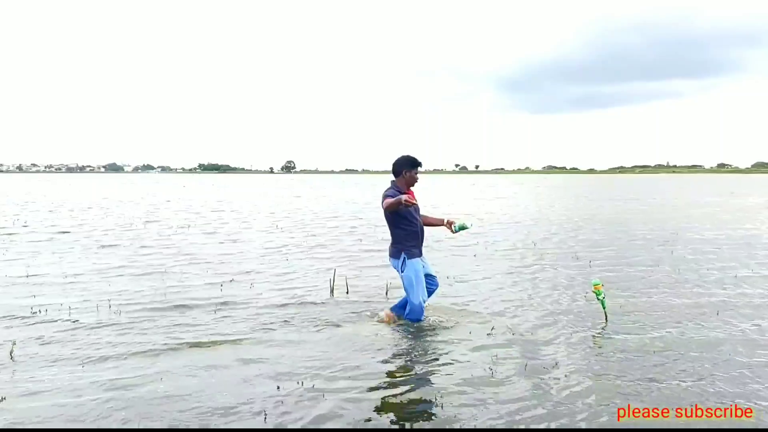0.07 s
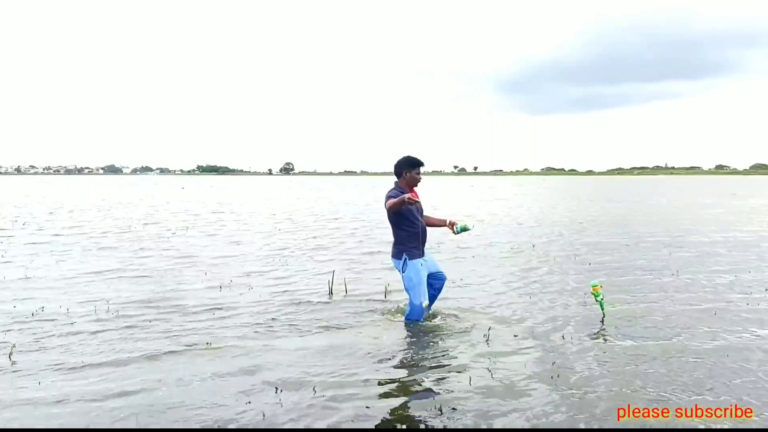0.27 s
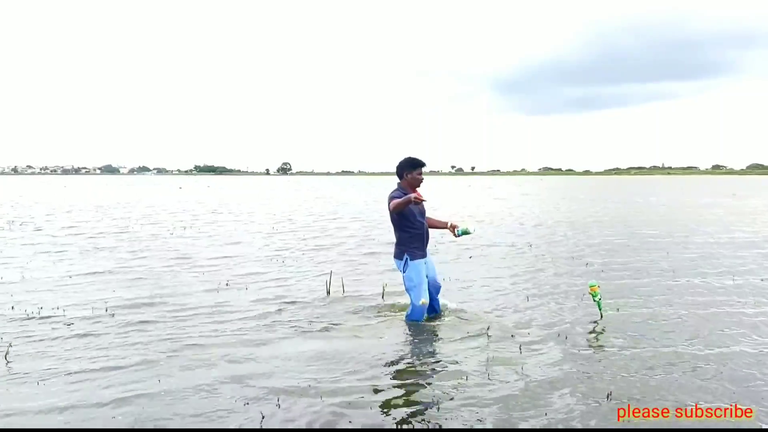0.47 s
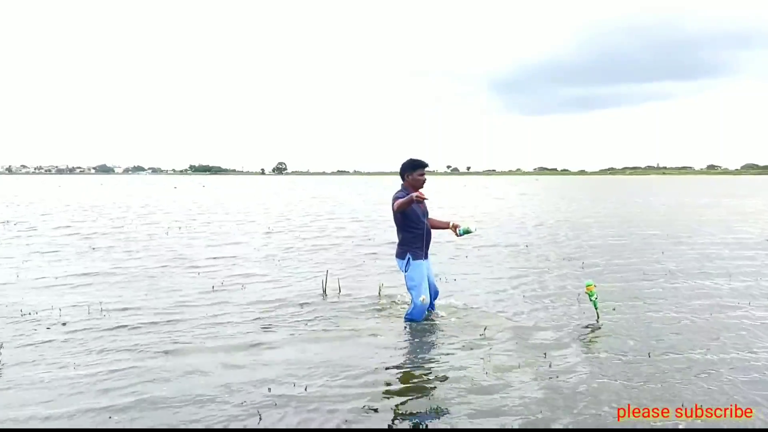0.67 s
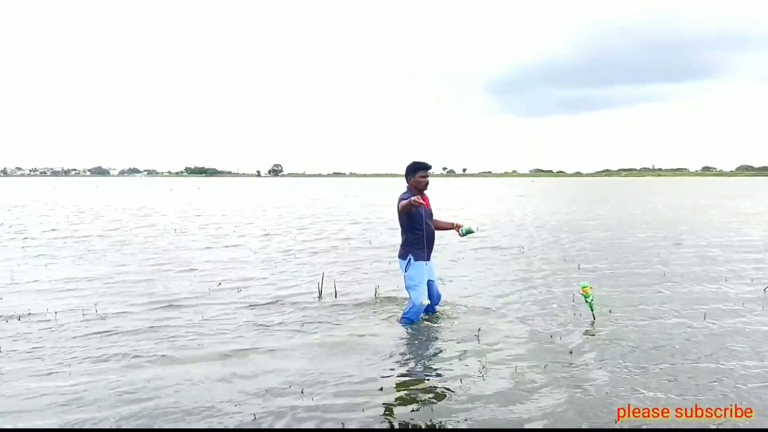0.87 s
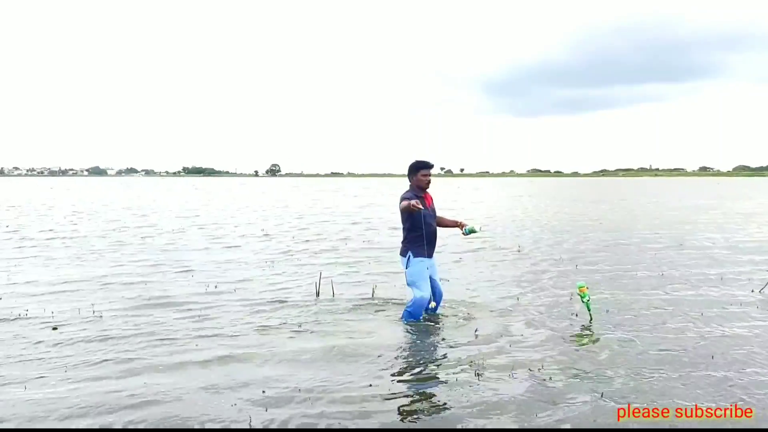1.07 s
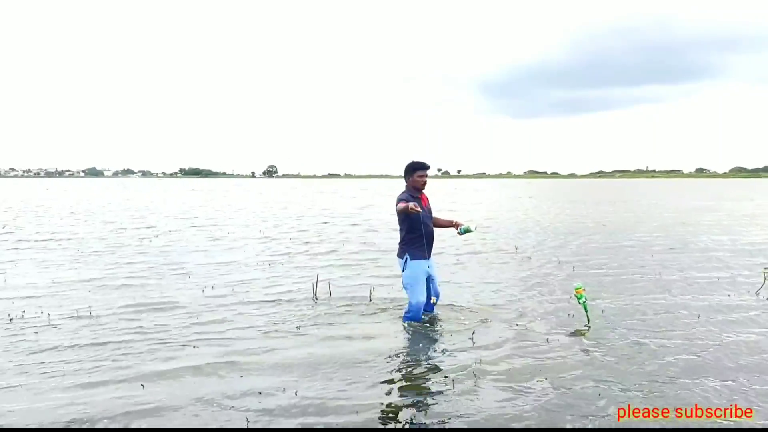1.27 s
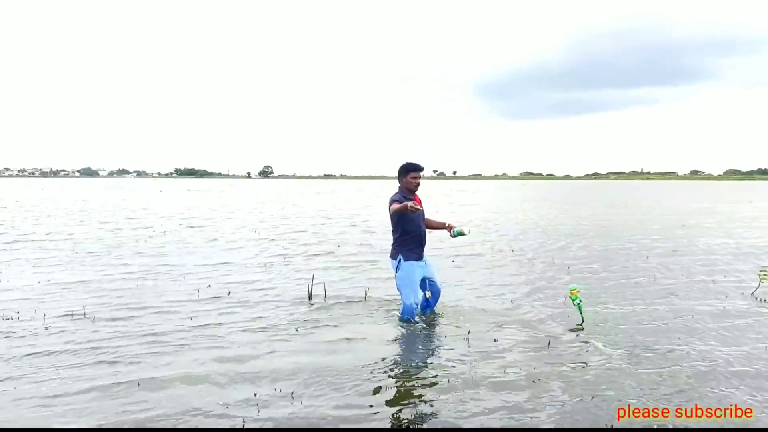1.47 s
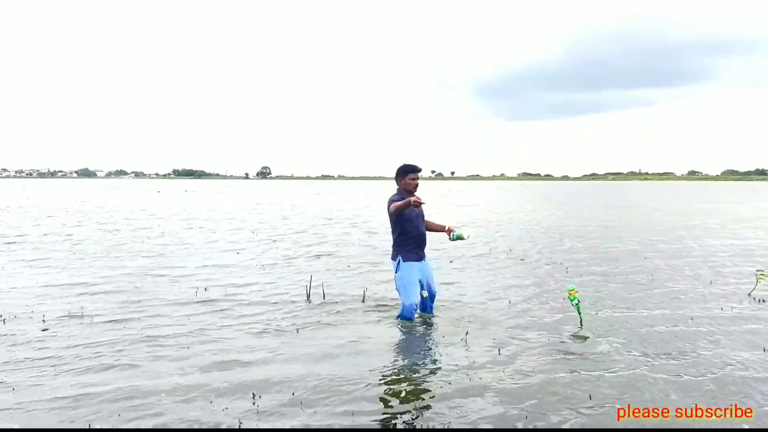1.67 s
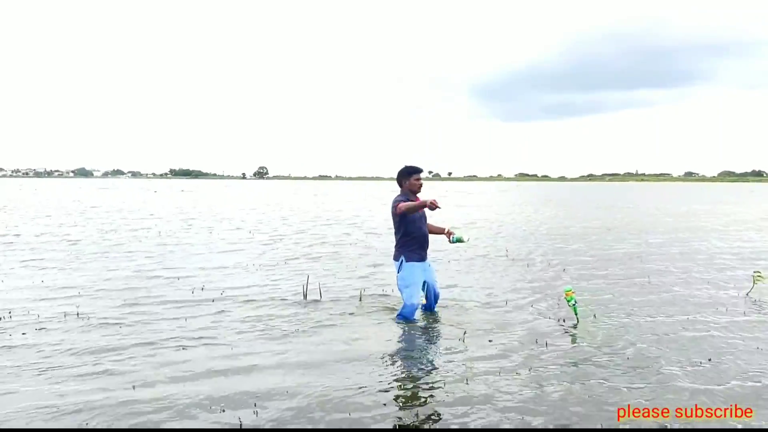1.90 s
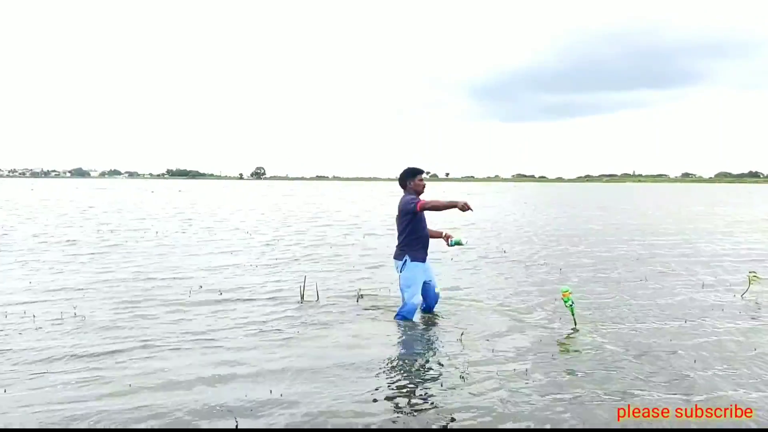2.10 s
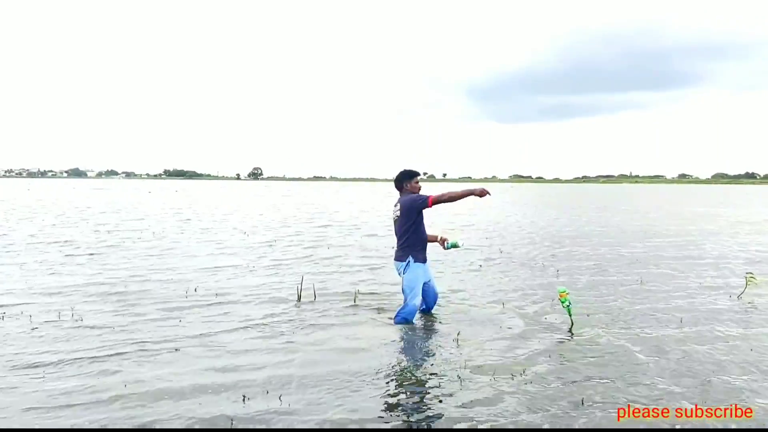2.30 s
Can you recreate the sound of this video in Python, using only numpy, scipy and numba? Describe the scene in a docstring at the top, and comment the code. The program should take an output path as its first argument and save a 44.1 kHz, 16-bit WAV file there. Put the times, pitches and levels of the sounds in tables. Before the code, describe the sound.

Slow wading in a shallow lake, gulping plops and drips under hard buffeting wind on the microphone

```python
"""Wind flutters on two microphone ports at a shallow lake, with hard buffets and deep thumps: filtered
random eddies, low noise and short pressure pulses.
Close to the microphone something rustles and a tiny metal part chinks: friction clicks and ringing modes.
Someone wades slowly through the water: a cloud of rising-pitch bubbles over a wash of spray, with
louder gulps, plops and drips."""
import sys
import numpy as np
from scipy import signal
from scipy.fft import rfft, irfft
from scipy.io import wavfile
from scipy.ndimage import uniform_filter1d
from numba import njit

SR = 44100
rng = np.random.default_rng(int(sys.argv[2]) if len(sys.argv) > 2 else 0)


def to_wav(s):
    """Save 16-bit WAV."""
    ch = np.atleast_2d(s).T  # columns
    pcm = np.round(np.clip(ch, -1, 1) * 32767)  # PCM
    wavfile.write(sys.argv[1], SR, pcm.astype(np.int16))


N = 103458  # length [samples]


def undb(db):
    """Amplitude factor from decibels."""
    return 10 ** (np.asarray(db) / 20)


def unit(x):
    """Scale to rms 1."""
    return x / np.sqrt(np.mean(x ** 2))


def curve(rows):
    """Gain over time from (time [s], level [dB]) rows."""
    return undb(np.interp(np.arange(N) / SR, *np.array(rows).T))


def colour(x, points):
    """Filter by (frequency [Hz], level [dB]) points, to rms 1."""
    hz, db = np.array(points).T
    f = np.fft.rfftfreq(N, 1 / SR) + 1  # +1 Hz keeps the logarithm finite
    gain = undb(np.interp(np.log(f), np.log(hz), db))
    return unit(irfft(rfft(x) * gain, N))


def pan(db):
    """Left and right gains that differ by db; negative leans right."""
    return undb(np.array([[db], [-db]]) / 2)


def ports(make, likeness):
    """Left and right versions of a random sound that share a part of their power."""
    shared = np.clip(likeness, 0, 1)
    return np.sqrt(shared) * make() + np.sqrt(1 - shared) * np.array([make(), make()])


def noise():
    """White noise."""
    return rng.standard_normal(N)


def clicks(rate, spread_db):
    """Random impulses of uneven size, rms 1; rate is per second."""
    struck = rng.random(N) < rate / SR
    size = undb(spread_db * np.clip(noise(), -2, 2))
    return unit(struck * np.sign(noise()) * size)


def walk(count):
    """Smooth chance with count steps a second, rms 1."""
    k = SR // count
    steps = np.repeat(rng.standard_normal(N // k + 1), k)
    return unit(uniform_filter1d(steps, k)[:N])


def add(out, start, x):
    """Mix x into out from start [s], cut at the end."""
    i = max(int(start * SR), 0)
    out[i:i + len(x)] += x[:max(N - i, 0)]


@njit
def lowpass(x, hz):
    """Two-pole low-pass with a moving edge [Hz]."""
    y, b, l = np.empty(len(x)), 0., 0.
    for i in range(len(x)):
        g = np.tan(np.pi * hz[i] / SR)
        v = (b + g * (x[i] - l)) / (1 + g * (g + 1.05))
        y[i] = l + g * v
        b, l = 2 * v - b, 2 * y[i] - l
    return y


def swells(rows, half):
    """Bell-shaped swells of power from (time [s], level [dB]) rows; half is the time [s] to fall to 1/e."""
    t = np.arange(N) / SR
    return sum(undb(2 * db) * np.exp(-((t - s) / half) ** 2) for s, db in rows)


FLUTTER_REF_DB, DB_PER_OCTAVE = -27, 17.5


def brightness(force):
    """Stronger wind sheds smaller, quicker eddies: a factor on frequency, 1 up to the reference level."""
    excess_db = np.maximum(20 * np.log10(force) - FLUTTER_REF_DB, 0)
    return 2 ** (excess_db / DB_PER_OCTAVE)


SWELL_S = 0.01  # half-width of buffets and thumps
FLUTTER_HZ, FLUTTER_LOW_HZ = 360, 221  # upper edge in weak wind, lower edge
EDDY_RATE, EDDY_SPREAD_DB, FLUTTER_WALK_DB = 600, 6.5, 3.5  # rate per second
# steady wind on the ports: (time [s], level [dB])
WIND_LEVEL = [(0,-32),(.12,-42.5),(.26,-31),(.37,-42.5),(.5,-29.5),(.62,-32.5),(.77,-39.5),(.97,-45),(1.15,-33),(1.32,-33),(1.41,-39.5),(1.47,-30.5),(1.6,-23),(1.88,-29.5),(2.02,-26.5),(2.21,-31.5),(2.28,-45)]
# buffets of wind, before trims: (time of the peak [s], level [dB])
WIND_BUFFETS = [(.266,-33),(.652,-23.5),(.815,-32),(1.079,-29),(1.158,-27),(1.182,-20.5),(1.293,-25.5),(1.307,-21.5),(1.33,-20.5),(1.586,-20.5),(1.636,-23),(1.698,-17.5),(1.71,-20),(1.774,-21.5),(1.794,-18),(1.805,-15),(1.817,-12.5),(1.836,-20),(1.916,-21),(1.939,-16),(1.951,-20),(1.994,-19.5),(2.012,-19),(2.061,-27),(2.124,-22),(2.208,-24),(2.256,-25)]


def flutter():
    """Eddies hit each port on their own, in quick lumps that are brighter in stronger wind."""
    force = np.sqrt(curve(WIND_LEVEL) ** 2 + undb(-6) * swells(WIND_BUFFETS, SWELL_S))
    edge = np.clip(FLUTTER_HZ * brightness(force), 100, 3000)
    high = signal.butter(2, FLUTTER_LOW_HZ, "high", fs=SR, output="sos")

    def eddies():
        """Low-passed random impulses, with their slower level changes evened out."""
        x = lowpass(lowpass(clicks(EDDY_RATE, EDDY_SPREAD_DB), edge), edge)
        x = signal.sosfilt(high, x) * undb(FLUTTER_WALK_DB * walk(count=70))
        local_power = uniform_filter1d(x ** 2, size=1500)  # over 34 ms
        return x / np.sqrt(local_power + 1e-9)

    return force * np.array([eddies(), eddies()])


RUMBLE_DB, RUMBLE_FOLLOWS, RUMBLE_WALK_DB = -16, 0.56, 1.5  # FOLLOWS: power of the wind's gain
# deep thumps of wind, before trims: (time of the peak [s], level [dB])
WIND_THUMPS = [(0.219,-21),(0.324,-23.5),(.425,-24),(.59,-20.5),(1.449,-25.5),(1.594,-16.5),(1.685,-25),(1.812,-17.5)]
# spectrum of the rumble: (frequency [Hz], level [dB])
RUMBLE_SPECTRUM = [(20,-33),(40,-10),(95,-1),(140,-1.5),(220,-19),(600,-56.5)]


def rumble():
    """Low noise, separate on each port, follows the wind loosely and swells with the thumps."""
    steady = undb(RUMBLE_DB) * curve(WIND_LEVEL) ** RUMBLE_FOLLOWS
    level = np.sqrt(steady ** 2 + swells(WIND_THUMPS, SWELL_S) / 2 ** 2)
    rough = np.array([noise() * undb(RUMBLE_WALK_DB * walk(count=30)) for _ in range(2)])
    return level * colour(rough, RUMBLE_SPECTRUM)


SLAP_LAG_S = 0.00095  # largest shift of each port, in opposite directions


def slaps(rows, pitch):
    """The core of each gust strikes the two ports as one short pressure pulse, a little apart."""
    t, out = np.arange(N) / SR, np.zeros((2, N))
    for (s, db), lag in zip(rows, rng.uniform(-0.9, 1, len(rows))):
        shift = SLAP_LAG_S * lag * np.array([[1], [-1]])
        u = np.pi * pitch(undb(db)) * (t - s - shift)
        out += undb(db) * (2 * u ** 2 - 1) * np.exp(-u ** 2)
    return out


SLAP_HZ, SLAP_DB = 382, -3  # pitch in weak wind, trim
THUMP_HZ, THUMP_DB = 84.4, -1  # pitch, trim


def wind():
    """Fluttering eddies and rumble, with pressure pulses for buffets and thumps."""
    buffets = undb(SLAP_DB) * slaps(WIND_BUFFETS, lambda force: SLAP_HZ * brightness(force))
    thumps = undb(THUMP_DB) * slaps(WIND_THUMPS, lambda force: THUMP_HZ)
    return flutter() + rumble() + buffets + thumps


def ring(hz, t60):
    """One fading mode of the metal part; t60 [s] is its time to fall by 60 dB."""
    t = np.arange(SR // 8) / SR
    return np.sin(2 * np.pi * min(hz, SR / 2) * t) * np.exp(-np.log(1000) * t / t60)


GRAIN_RATE, GRAIN_SPREAD_DB = 1800, 7  # rate per second
# spectrum of the rustle: (frequency [Hz], level [dB])
RUSTLE_SPECTRUM = [(2000,-9.5),(3200,-16),(4800,-1.5),(6500,-9.5),(7700,-5.5),(8800,-10),(10000,-3),(13500,1.5),(16000,-3)]
# gain of the top octave, also applied to the light rattle: (time [s], level [dB])
TREBLE_LEVEL = [(.6,-10.5),(1.3,-6)]


def friction():
    """Dense friction clicks, partly shared by the ports, whose top octave changes level."""
    grain = colour(ports(lambda: clicks(GRAIN_RATE, GRAIN_SPREAD_DB), likeness=.25), RUSTLE_SPECTRUM)
    top = signal.sosfiltfilt(signal.butter(2, SR / 5, "high", fs=SR, output="sos"), grain)
    return grain + (curve(TREBLE_LEVEL) - 1) * top


RUB_WALK_DB, SHAKE_DB, CHINK_TICK_DB = 1.8, -12, -12.5
RUSTLE_PAN_DB, METAL_PAN_DB = -3, -9.5
# rubbing beside the microphone, before panning: (time [s], level [dB])
RUB_LEVEL = [(0,-52),(.46,-55.5),(.6,-46.5),(.72,-46),(.81,-53),(.9,-47),(.99,-61.5),(1.05,-51.5),(1.5,-56.5),(1.73,-50.5),(2.08,-62.5),(2.16,-54)]
# short scrapes: (time [s], level [dB], decay [s], metal level relative to the scrape [dB])
SHORT_SCRAPES = [(.22,-38,0.0035,-17),(0.263,-37,0.0044,-23),(0.629,-50,0.0062,-7),(0.698,-45,0.043,-14),(0.818,-39.5,0.0024,-37),(0.867,-42,0.026,-19),(1.012,-47.5,0.015,-4),(1.356,-44.5,0.029,-5),(1.844,-58,0.014,7),(1.908,-43,0.014,0.5)]
# chinks of metal, before panning: (time [s], lower mode level [dB], upper mode level [dB])
METAL_CHINKS = [(2.217,-41,-51),(2.25,-50,-41),(2.27,-47,-48),(2.319,-56,-46.5),(2.329,-37.5,-39)]
# modes of the metal part: (frequency [Hz], time to fall by 60 dB [s])
METAL_MODES = [(11040,0.071),(13920,0.075)]


def rustle():
    """Rubbing and short scrapes shake a damped metal part, which rings more freely as it chinks."""
    t = np.arange(SR // 4) / SR
    scrape, shake, chinks = np.zeros(N), np.zeros(N), np.zeros(N)
    for s, db, decay, ring_db in SHORT_SCRAPES:
        stroke = 2 * np.exp(-t / decay) * (1 - np.exp(-2 * t / decay))
        add(scrape, s, undb(db) * stroke)
        add(shake, s, undb(db + ring_db) * stroke)
    for s, *levels in METAL_CHINKS:
        add(scrape, s, undb(max(levels) + CHINK_TICK_DB) * np.exp(-t / 0.0075))  # tick of contact
        for (hz, t60), db in zip(METAL_MODES, levels):
            add(chinks, s, undb(db) * ring(hz, t60))
    rub = curve(RUB_LEVEL) * undb(RUB_WALK_DB * walk(count=130))
    damped = unit(signal.fftconvolve(noise(), ring(METAL_MODES[1][0], t60=.012))[:N])
    rattle = (undb(SHAKE_DB) * rub * curve(TREBLE_LEVEL) + shake) * damped
    return (rub + scrape) * friction() * pan(RUSTLE_PAN_DB) + (rattle + chinks) * pan(METAL_PAN_DB)


BUBBLE_RISE = 0.075  # pitch rises by half this fraction over the given cycles


def bubble(hz, cycles):
    """A ringing air bubble whose pitch rises as it fades."""
    turn = np.arange(int(3 * cycles * SR / hz)) * hz / SR  # time in cycles
    tone = np.sin(2 * np.pi * turn * (1 + BUBBLE_RISE * turn / cycles / 4))
    return tone * np.exp(-2 * turn / cycles) * (1 - np.exp(-2 * turn))


BUBBLE_RATE, BUBBLE_CYCLES, BUBBLE_SPREAD_DB = 1800, 8.8, 5.5  # rate per second before thinning
WASH_DB, CALM_THINNING = -0.98, .3  # wash relative to the bubbles; power of the slosh gain
# water moved by the legs: (time [s], level [dB])
SLOSH_LEVEL = [(0,-51.5),(.12,-58),(.2,-43.5),(.4,-50.5),(.6,-44.5),(.75,-49.5),(1.0,-63.5),(1.22,-57.5),(1.7,-53),(2.1,-69.5)]


def bubbles():
    """A cloud of small bubbles over a wash of spray; as the water calms the bubbles thin out."""
    out = np.zeros(N)
    slosh = curve(SLOSH_LEVEL)
    busy = (slosh / slosh.max()) ** CALM_THINNING
    for when, pitch, size, life, luck in rng.random(size=(int(BUBBLE_RATE * N / SR), 5)):
        share = busy[int(when * N)]
        if luck < share:
            gain = undb(-BUBBLE_SPREAD_DB * np.log(max(size, .06)))
            gain = gain * 2 ** (1.5 * pitch) / np.sqrt(share)  # fewer bubbles are each louder
            add(out, when * N / SR, gain * bubble(500 * 12 ** pitch, BUBBLE_CYCLES * (.5 + life)))
    return unit(out) + undb(WASH_DB) * clicks(rate=3000, spread_db=5)


PLOP_CYCLES, SATELLITE_DB, SATELLITE_OCTAVES = 12, -10.5, 1.1  # OCTAVES: full width of the pitch range
# single gulps, plops and drips: (time [s], pitch [Hz], level [dB])
SINGLE_PLOPS = [(.153,700,-30.5),(.196,815,-27),(.202,1124,-36.5),(0.219,1590,-35),(.225,2240,-38),(0.273,2730,-35.5),(0.298,2150,-34),(.444,7000,-45.5),(0.463,332,-29),(.486,315.7,-21),(0.515,323.3,-21.5),(0.626,1565,-39),(0.821,4700,-32),(1.235,6020,-36.5),(1.284,7400,-44),(1.304,3440,-46),(2.108,7700,-39),(2.114,7150,-40),(2.135,4480,-45),(2.334,4120,-47.5)]


def plops():
    """Single bubbles stand out, each with seven fainter, shorter ones near its pitch."""
    out = np.zeros(N)
    for s, hz, db in SINGLE_PLOPS:
        add(out, s, undb(db) * bubble(hz, PLOP_CYCLES))
        for late, octaves in rng.random(size=(7, 2)):
            pitch = min(hz * 2 ** (SATELLITE_OCTAVES * (octaves - .5)), SR / 2)
            satellite = undb(db + SATELLITE_DB) * bubble(pitch, PLOP_CYCLES / 2)
            add(out, s + late * PLOP_CYCLES / hz, satellite)
    return out


WATER_LIKENESS = .6  # share of power common to both ports
# spectrum of the slosh: (frequency [Hz], level [dB])
SLOSH_SPECTRUM = [(250,9),(900,3.5),(1250,-2.5),(1600,4.5),(1900,-5.5),(2300,5.5),(2700,-6.5),(4000,-5.5),(15000,-42)]


def water():
    """The wading legs stir up bubbles and spray; plops sound in the middle."""
    return curve(SLOSH_LEVEL) * colour(ports(bubbles, WATER_LIKENESS), SLOSH_SPECTRUM) + plops()


def scene():
    """Wind on the ports, rustle close by, water round the legs."""
    return wind() + rustle() + water()


def record(dry):
    """The recorder cuts the top above 15450 Hz steeply."""
    return signal.sosfilt(signal.ellip(10, .2, 80, 15450, fs=SR, output="sos"), dry)


dry = scene()
out = record(dry)
to_wav(out)
```